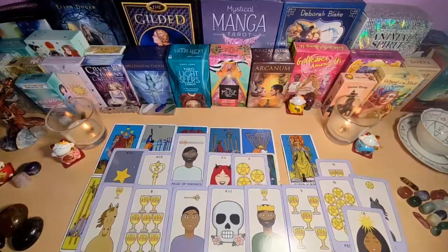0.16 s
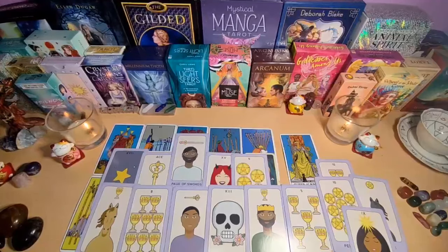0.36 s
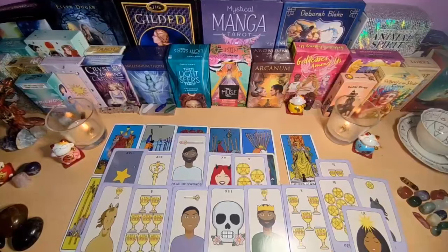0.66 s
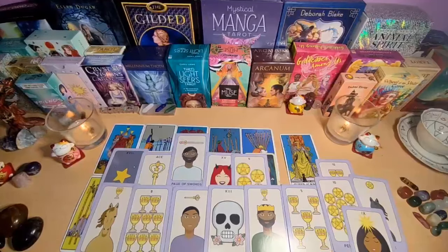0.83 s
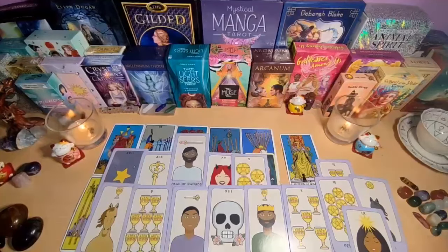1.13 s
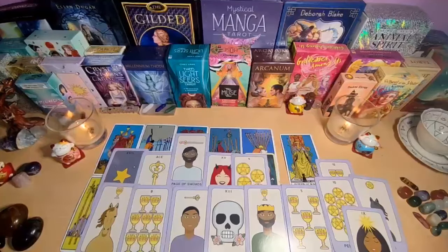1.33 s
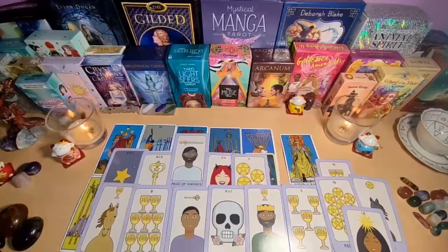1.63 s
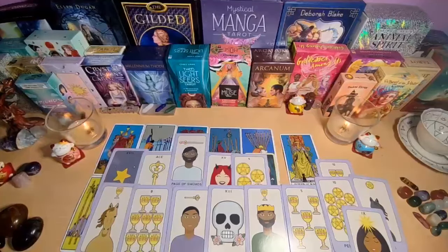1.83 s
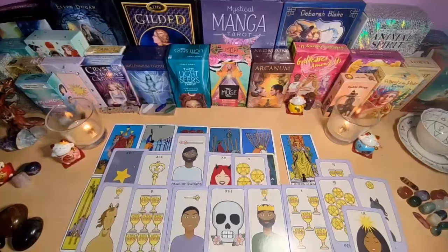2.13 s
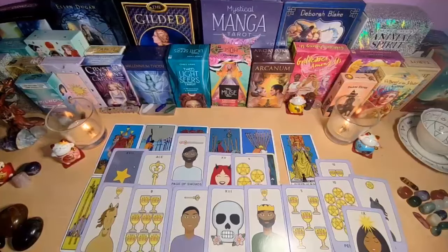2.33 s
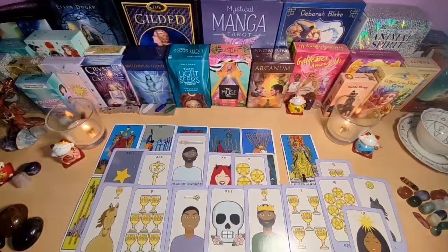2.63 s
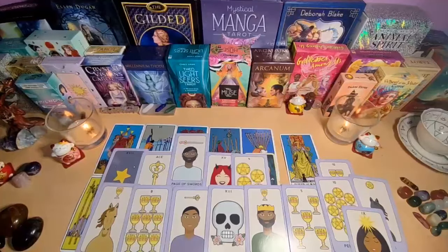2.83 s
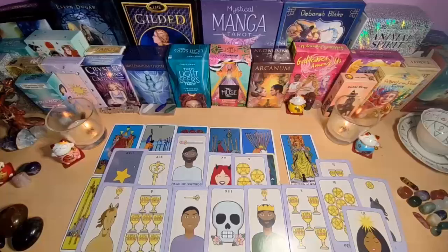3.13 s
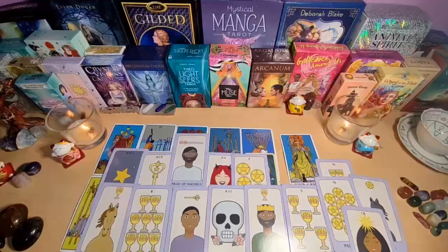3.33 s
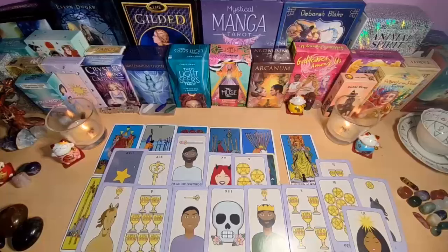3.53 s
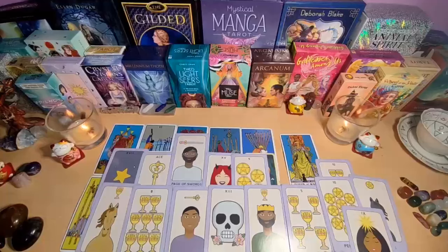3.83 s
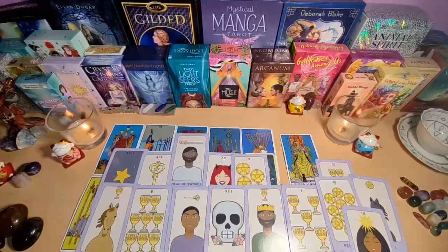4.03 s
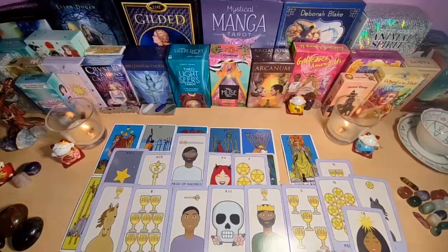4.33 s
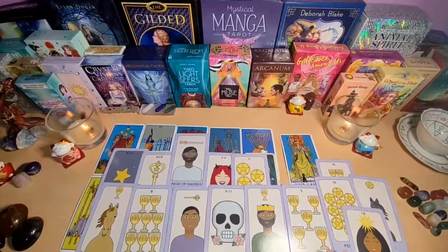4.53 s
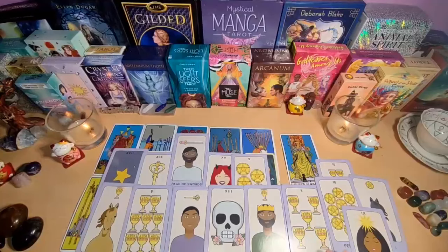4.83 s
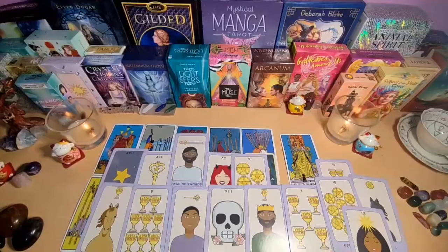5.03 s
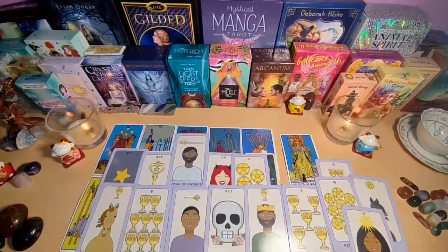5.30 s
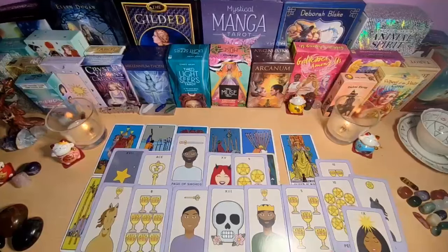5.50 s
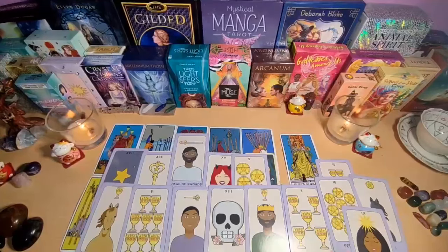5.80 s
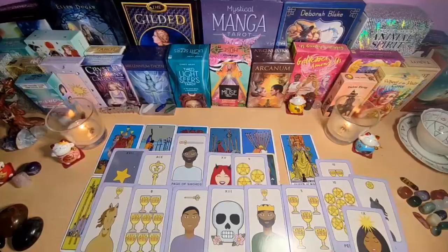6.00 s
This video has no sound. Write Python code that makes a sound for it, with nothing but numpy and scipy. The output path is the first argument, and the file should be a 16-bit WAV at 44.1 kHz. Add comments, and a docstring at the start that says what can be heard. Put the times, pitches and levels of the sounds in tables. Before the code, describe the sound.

Close to the microphone in a quiet room, a handful of light metal trinkets is shaken in a small container. Bright tinkling and hard rattling come in short bursts, fading after under two seconds. Irregular hollow taps and little ticks fill the middle. After some low handling bumps, the shaking returns with crisp, hissier jangling and continues to the end over soft air and low rumble.

```python
"""Small metal charms are stirred and shaken in a container, close by, in a quiet room.
From 0 s quick tosses jangle the heap (many ticked, ringing modes) and clatter on the wall (filtered contacts).
Loose charms ring out (tapped decaying sines); knocks (thud, clack, tick, one bounce) go on through the lull.
From 4.3 s a second spell of tosses follows, with wafts of air and soft bumps as it begins.
Throughout: low buffeting of the microphone, quiet room air and weak reflections; soft noise swells from 3.8 s."""
import sys
import numpy as np
from scipy import signal
from scipy.fft import rfft, irfft
from scipy.io import wavfile
from scipy.ndimage import uniform_filter1d

SR = 44100
rng = np.random.default_rng(int(sys.argv[2]) if len(sys.argv) > 2 else 0)


def store_wav(level_fs):
    """Save 16-bit WAV to argv[1]."""
    pcm = np.round(np.clip(np.atleast_2d(level_fs), -1, 1) * 32767)
    wavfile.write(sys.argv[1], SR, pcm.T.astype(np.int16))


N = 271656
TIME_S = np.arange(N) / SR

# spectrum of the room air: f/Hz, relative density/dB
AIR_SPECTRUM = [(41, -30), (70, -3.5), (129, -7), (277, -8), (323, -10), (546, -18.5), (1200, -24.5),
                (1980, -31), (10400, -39.5), (12200, -57.5), (13000, -46)]
# spectrum of the low buffeting: f/Hz, relative density/dB
RUMBLE_SPECTRUM = [(2, -18), (8, 11), (15, -22.5), (30, -11.5), (60, -29.5), (120, -39.5), (250, -75)]
# air wafted at the microphone by the moving hand: middle t/s, spread t/s, level before the buffeting trim/dB
WAFTS = [(.25, 0.34, -39), (3.88, 0.19, -38.5), (4.29, 0.11, -24), (4.55, 0.21, -39), (5.1, 0.21, -42.5),
         (5.9, 0.39, -38.5)]
# soft handling bumps: t/s, peak level/dB, f/Hz
BUMPS = [(4.142, -30, 50.2), (4.338, -20.5, 67), (4.586, -30.5, 218)]
# decay of the room: f/Hz, t60/s
ROOM_DECAY = [(200, .4), (1200, 0.41), (4000, 0.47), (8000, 0.14), (13000, 0.4)]
# soft broad noise swells; the last is a long mid-high hiss under the second spell:
# middle t/s, spread t/s, level/dB, centre f/Hz, half width/octaves
SWELLS = [(3.858, 0.021, -47.5, 460, 0.66), (3.795, .06, -55, 4300, .27), (4.2, 0.18, -64, 2980, 0.61),
          (4.24, .025, -56, 5500, .7), (5.1, 0.45, -47, 3300, 0.45)]
# modes of the container: mean f/Hz, mean relative level/dB, t60/s
CONTAINER_MODES = [(440, -11.5, .05), (620, 4, 0.024), (755, 1.5, 0.021), (942, -10, 0.09),
                   (1100, -3, 0.099), (1229, -2.5, 0.067), (1407, 12.5, 0.013), (1645, 6, 0.027),
                   (1897, 5.5, 0.0094), (2226, 5.5, .03), (2844, -10, 0.033), (4300, -15.5, .025)]
# blows of charms on the container, levels before trims:
# t/s, thud level/dB, thud centre f/Hz, clack level/dB, metal tick level/dB
KNOCKS = [(1.073, -30.5, 1159, -49, -30), (1.163, -29.5, 1870, -31.5, -27), (1.642, -52, 1110, -50, -26),
          (1.659, -23, 1860, -22, -12.5), (1.673, -46, 1360, -37, -32), (1.756, -41, 1200, -46, -32),
          (1.857, -56, 850, -52, -51), (1.873, -66, 1340, -43.5, -54.5), (1.892, -60, 1038, -45.5, -45),
          (1.937, -56, 1220, -42, -57), (2.049, -48, 496, -73, -81), (2.141, -30.5, 840, -31.5, -45),
          (2.223, -56, 840, -44.5, -48), (2.319, -60, 570, -51, -76), (2.49, -21.5, 620, -34, -39.5),
          (2.532, -29.5, 810, -38, -37.5), (2.5613, -26.5, 704, -33, -42), (2.579, -36.5, 990, -49.5, -45),
          (2.7243, -31.5, 1040, -37, -37), (2.738, -30, 1093, -41, -38), (2.776, -31.5, 810, -37, -32),
          (2.809, -32, 980, -40, -30.5), (2.943, -53, 910, -63, -55), (3.1923, -30, 700, -35, -38),
          (3.1995, -22.5, 864, -29.5, -31.5), (3.209, -26, 1000, -54, -50), (3.481, -72.5, 373, -57, -56),
          (3.605, -32, 900, -34.5, -38), (3.6125, -28.5, 706, -29.5, -35),
          (3.745, -26.5, 1120, -29.5, -40.5), (3.757, -42, 1300, -34, -43), (3.845, -39.5, 446, -58, -72.5),
          (4.203, -38, 1206, -50, -63), (4.221, -33, 1020, -53, -60), (4.287, -48, 1100, -44, -32.5),
          (4.331, -40.5, 570, -63, -39), (4.383, -29.5, 1810, -37, -40), (4.462, -26.5, 1750, -58, -39),
          (4.567, -35.5, 570, -62, -65), (4.584, -27.5, 361, -50, -46), (4.605, -28.5, 940, -43, -41),
          (4.686, -25, 670, -30.5, -46), (5.029, -38, 1400, -33, -48), (5.621, -31, 710, -53, -21.5),
          (5.742, -40.5, 1295, -32, -50), (5.829, -34, 1100, -41, -35), (5.89, -42, 750, -59, -34),
          (5.994, -34.5, 1090, -35, -39)]
# width of the thuds, broadest near 750 Hz, narrow for the highest: centre f/Hz, half width/octaves
THUD_WIDTHS = [(400, 0.66), (750, 0.97), (1100, .68), (1400, .65), (1700, .22)]
# colour of the wall's clack: f/Hz, gain/dB
CLACK_SPECTRUM = [(900, -12.5), (2000, 0.5), (2700, 2.5), (3400, -4.5), (4400, -3.5), (5200, -5.5),
                  (7500, -31)]
# colour of the metal tick: f/Hz, gain/dB
TICK_SPECTRUM = [(2500, -38.5), (4500, -8.5), (5600, 5.5), (7000, -0.5), (8500, -5.5), (10500, -6.5),
                 (12500, -9)]
# modes of the charms that ring clearly, by charm: f/Hz, relative level/dB, t60/s
CHARM_MODES = { "disc": [(3640, -15, 0.1), (6618, 1, 0.09), (7040, -16, .05), (8780, -22, 0.25),
               (10100, -16, .2)], "heart": [(1625, -6.5, 0.04), (3615, -12, 0.067), (6612, 14, 0.026),
               (8796, -16, 0.071), (9400, -14, 0.13), (10030, -28, .2)], "plate": [(6075, 8, 0.16),
               (8048, -24, .3), (8775, -22, .16), (10300, -23, 0.21), (10900, -12.5, 0.24)],
               "bar": [(3070, -2, 0.032), (5288, -7, 0.15), (6400, -23, .12), (7873, -11, .12),
               (9290, -13, .07), (10271, -9, 0.092)], "pendant": [(5440, -2, .07), (5840, 2, .05),
               (5620, 1, 0.028), (6880, -19.5, 0.072), (7065, -4, 0.09), (10265, -6, .1)],
               "bead": [(8140, -2, 0.2), (10250, 16.5, .1)], "star": [(10011, -8, 0.14),
               (11140, -4.5, .08)], "key": [(3600, -2.5, 0.038), (6560, -2, .04), (8785, -3, 0.09)],
               "hoop": [(4570, -2, .24), (5900, 0, .26), (10950, 0, .12), (11800, 0, .1)],
               "coin": [(2430, 9, 0.094), (2550, 6.5, 0.16), (2770, 7, 0.12), (2800, 9, 0.12)],
               "pin": [(4160, -3, .5), (6191, -9, .15), (8667, 0, .15)], }
# charms that swing free and chatter: t/s, charm, level before trim/dB, chatter length/s
RINGS = [(0.073, "bead", -35, 0.032), (0.124, "bar", -34.5, 0.044), (.212, "bar", -25.5, 0.053),
         (.285, "bar", -33.5, .025), (.42, "bar", -31, 0.085), (0.657, "pendant", -32, 0.023),
         (0.682, "bead", -30, 0.025), (0.876, "disc", -23.5, .002), (0.889, "disc", -24.5, .03),
         (.953, "key", -32.5, .015), (1.37, "bead", -34, .02), (1.452, "star", -37, .01),
         (1.494, "pendant", -29, 0.017), (1.529, "pendant", -31, 0.048), (1.636, "pendant", -29, 0.022),
         (1.658, "pendant", -32, 0.0038), (1.732, "disc", -33.5, .002), (1.755, "star", -36.5, 0.012),
         (1.938, "heart", -44.5, 0.0018), (2.14, "coin", -41.5, .008), (2.811, "hoop", -44, .004),
         (3.486, "pin", -69, .04), (3.748, "coin", -54, 0.006), (4.377, "heart", -27, .01),
         (4.453, "disc", -34, 0.0069), (4.463, "heart", -23, 0.0082), (4.815, "star", -37, .02),
         (5.164, "disc", -31.5, 0.041), (5.338, "bead", -40, .003), (5.594, "bead", -36, 0.0087),
         (5.599, "plate", -27, 0.036), (5.673, "plate", -21.5, 0.042)]
# colour of the heap's jangle: f/Hz, gain/dB
JANGLE_SPECTRUM = [(1290, -58), (2200, -14), (2730, -8.5), (2980, -4), (3390, -10), (4590, -9),
                   (5450, -1.5), (6140, -5.5), (8770, -8.5), (10200, -8.5), (10800, -9.5), (12400, -15.5),
                   (13000, -29)]
# colour of the wall's clatter at grip factor 1: f/Hz, gain/dB
WALL_SPECTRUM = [(100, -11), (250, -10), (450, -7), (750, -4), (1150, 1), (1800, 3.5), (2400, -3),
                 (3500, -14.5), (6000, -7)]
# grip on the container: from t/s, factor on the frequencies of the clatter's colour
GRIPS = [(0, 1), (1.24, 0.85), (4.55, 1.1)]
# flicks of the wrist tossing the heap: start t/s, tumble length/s,
# jangle level/dB, clatter level/dB, top treble relative to the jangle before trim/dB
TOSSES = [(0.0, 0.055, -39.5, -34.5, -1.5), (0.029, 0.063, -28, -30, -2.5),
          (0.155, 0.098, -27.5, -30.5, -2.5), (.277, 0.038, -31.5, -34, -3), (0.351, .26, -37, -36.5, -14),
          (.595, 0.032, -37, -33, -1.5), (.636, .07, -32, -36, -0.5), (.72, 0.27, -33, -34, -2.5),
          (0.996, .125, -41, -40.5, -3), (1.152, 0.064, -49, -41.5, -7), (1.258, 0.14, -36.5, -37.5, 0.5),
          (1.345, 0.093, -36.5, -43.5, -1), (1.477, 0.097, -35, -42, -0.5), (1.61, 0.05, -46, -42.5, -4),
          (1.748, 0.017, -38, -40.5, 5), (4.279, 0.028, -41, -37, -5), (4.35, .13, -44, -48.5, -4.5),
          (4.605, 0.17, -39.5, -37, -0.5), (4.717, .11, -30.5, -34.5, 1.5), (4.832, 0.12, -39.5, -40, 7),
          (4.937, 0.044, -35.5, -33, 11), (5.025, .075, -35, -35.5, 2), (5.115, 0.24, -33.5, -34, -5.5),
          (5.353, .11, -34, -36.5, -1.5), (5.453, 0.091, -30.5, -37, 0), (5.576, 0.14, -31, -39.5, 3.5),
          (5.748, 0.054, -42, -39, 3), (5.813, .11, -44, -46.5, 3), (5.918, .06, -34, -35, -4),
          (5.979, 0.21, -29, -32.5, -2)]


def amp(db):
    """Decibels to gain."""
    return 10 ** (np.asarray(db) / 20)


def evened(x):
    """Scales to rms 1."""
    return x / np.sqrt(np.mean(x ** 2) + 1e-20)


def steadied(x, size=2600):
    """Scales to a running rms of about 1, keeping the fast detail."""
    power = uniform_filter1d(uniform_filter1d(x ** 2, size), size // 2)
    return x / np.sqrt(abs(power) + 1e-12)


def peak_rms(x, size):
    """Rms of the loudest stretch of size samples."""
    return np.sqrt(uniform_filter1d(x ** 2, size, mode="constant").max())


def read(points, hz):
    """Interpolates a table on a log-frequency axis."""
    f, value = np.transpose(points)
    return np.interp(np.log(hz + 1), np.log(f + 1), value)


def bell(centre_hz, half_octaves, floor_db, top_hz):
    """Spectrum of one broad band, 3 dB down at the half width."""
    grid_hz = np.geomspace(50, top_hz, 40)
    fall_db = 3 * (np.log2(grid_hz / centre_hz) / half_octaves) ** 2
    return np.c_[grid_hz, np.maximum(-fall_db, floor_db)]


def add(mix, t_s, sound):
    """Mixes a sound in at a time."""
    part = mix[max(round(t_s * SR), 0):][:len(sound)]
    part += sound[:len(part)]


def coloured(x, points, size=2048):
    """Minimum-phase (causal) filter with the given spectrum."""
    gain_db = np.maximum(read(points, abs(np.fft.fftfreq(size, 1 / SR))), -100)
    log_gain = np.log(amp(gain_db))
    taps = np.fft.ifft(np.exp(np.conj(signal.hilbert(log_gain)))).real
    return signal.fftconvolve(x, taps)[:len(x)]


def noise(points):
    """Steady Gaussian noise with the given spectrum, rms 1."""
    gain = amp(read(points, np.fft.rfftfreq(N, 1 / SR)))
    return evened(irfft(rfft(rng.standard_normal(N)) * gain, N))


def ringing(modes, size=16000):
    """Dying sines: the answer of a body to one blow."""
    t = np.arange(size) / SR
    return sum(amp(db - 60 * t / max(t60_s, .003)) * np.sin(2 * np.pi * hz * t) for hz, db, t60_s in modes)


def in_container(x, ring_db, pitch_spread=0.041, place_db=3):
    """A blow plus container ringing; mode pitches and levels vary with where it lands."""
    modes = [(hz * rng.normal(1, pitch_spread), db + place_db * rng.standard_normal(), t60_s)
             for hz, db, t60_s in CONTAINER_MODES]
    ring = ringing(modes, size=5000)
    return x + amp(ring_db) * signal.fftconvolve(x, ring / np.linalg.norm(ring))[:len(x)]


def collisions(per_s=2600, spread_db=1.5, clump_db=2, clump_hz=80):
    """Random contacts of either sign, their force rising in little avalanches; a few are hard."""
    lowpass = signal.butter(2, clump_hz, fs=SR, output="sos")
    clumps = evened(signal.sosfilt(lowpass, rng.standard_normal(N)))
    hardness = np.minimum(rng.exponential(1, N), 4)
    force = amp(spread_db * hardness + clump_db * clumps)
    return force * rng.choice([-1, 1], N) * (rng.random(N) < per_s / SR)


def room_air(level_db=-58.5):
    """Steady quiet air of the room, as shaped noise."""
    return amp(level_db) * noise(AIR_SPECTRUM)


def buffeting(draught_db=-47, trim_db=5):
    """A steady draught and a few wafts of air rumble on the microphone; their powers add."""
    power = amp(draught_db) ** 2
    for middle_s, spread_s, db in WAFTS:
        power = power + (amp(db) * np.exp(-((TIME_S - middle_s) / spread_s) ** 2)) ** 2
    return amp(trim_db) * np.sqrt(power) * steadied(noise(RUMBLE_SPECTRUM), size=12000)


def handling_bumps(damping=3.9):
    """Soft bumps: low sines that swell and die, faster at higher pitch."""
    out, t = np.zeros(N), np.arange(SR // 4) / SR
    for t_s, db, hz in BUMPS:
        bump = np.sin(2 * np.pi * hz * t) * t * np.exp(-damping * hz * t)
        add(out, t_s, amp(db) * bump / abs(bump).max())
    return out


def room(x, build_s=0.0018, density=.12, count=3):
    """Dense weak reflections, decaying per band; their pattern shifts as the container moves."""
    out, t_tail = np.zeros(N), np.arange(SR) / SR
    for k in range(count):
        taps = rng.standard_normal(SR) * (rng.random(SR) < density)
        taps *= 1 - np.exp(-t_tail / build_s)
        hz, t, bands = signal.stft(taps, SR, nperseg=256)
        decay = amp(-60 * t / read(ROOM_DECAY, hz)[:, None])
        tail = signal.istft(bands * decay, SR, nperseg=256)[1]
        share = np.cos(np.pi * (TIME_S + k / count)) * np.sqrt(2 / count)
        out += signal.fftconvolve(x * share, tail / np.linalg.norm(tail))[:N]
    return out


def noise_swells():
    """Each swell is a soft rise and fall of fine random grains in one broad band."""
    out = np.zeros(N)
    for middle_s, spread_s, db, hz, half_octaves in SWELLS:
        grains = evened(coloured(collisions(), bell(hz, half_octaves, floor_db=-60, top_hz=13000)))
        out += amp(db) * grains * np.exp(-((TIME_S - middle_s) / spread_s) ** 2)
    return out


def contact(scrape_db, scrape_s, size=8000):
    """One sharp blow with a brief decaying skitter of noise."""
    skitter = rng.standard_normal(size) * np.exp(-np.arange(size) / SR / scrape_s)
    return signal.unit_impulse(size) + amp(scrape_db) * skitter / np.linalg.norm(skitter)


def knocks(trims_db=(-1, -1, 0), bounce_db=(-9, -18.5, -7.5), bounce_s=.0088, ring_db=-12, wall_hz=2400):
    """Container thud and clack plus charm tick (levels in that order), then one weaker bounce, its clack weakest."""
    out = np.zeros(N)
    wall_lowpass = signal.butter(3, wall_hz, fs=SR, output="sos")
    for t_s, thud_db, hz, clack_db, tick_db in KNOCKS:
        thud_spectrum = bell(hz, max(read(THUD_WIDTHS, hz), .2), floor_db=-40, top_hz=12000)
        blow_db = np.array([thud_db, clack_db, tick_db]) + trims_db
        for at_s, levels_db in (t_s, blow_db), (t_s + bounce_s, blow_db + bounce_db):
            thud = coloured(in_container(contact(scrape_db=14.5, scrape_s=0.0036), ring_db), thud_spectrum)
            thud = signal.sosfilt(wall_lowpass, thud)
            clack = coloured(in_container(contact(scrape_db=21.5, scrape_s=0.0024), ring_db), CLACK_SPECTRUM)
            tick = coloured(contact(scrape_db=14, scrape_s=0.0021), TICK_SPECTRUM)
            for part, db in zip((thud, clack, tick), levels_db):
                add(out, at_s, amp(db) * part / peak_rms(part, size=88))
    return out


def free_charms(chatter_per_s=420, trim_db=-1, first_tap=0.96):
    """A loose charm gets random taps that tend to grow harder, and rings on when they stop."""
    out = np.zeros(N)
    for t_s, charm, db, length_s in RINGS:
        taps = np.zeros(SR // 4)
        when, force = rng.random(40), rng.standard_normal(40)  # when: fraction of the chatter
        number = int(np.clip(length_s * chatter_per_s, 0, 40))
        places = (when * np.clip(length_s, 0, .24) * SR).astype(int)
        taps[places[:number]] = (force * np.sqrt(when))[:number]
        taps[0] = first_tap
        ring = signal.fftconvolve(taps, ringing(CHARM_MODES[charm]))
        add(out, t_s, amp(db + trim_db) * ring / peak_rms(ring, size=600))
    return out


def heap(hits, count=76, damped_t60_s=0.03, tick_db=-3, surfacing_db=5, turnover_hz=7):
    """Each contact ticks and rings one of many charms; they surface and sink as the heap turns over."""
    owner, rings = rng.integers(0, count, N), np.zeros(N)
    for k in range(count):
        pitch, hold = rng.random((2, 3))  # three modes a charm
        t60_s = damped_t60_s * 2 ** (2 * hold - 1)
        modes = zip(2200 + 10400 * pitch, rng.normal(0, 3, 3), t60_s)
        mine = owner == k
        exposure = np.clip(rng.standard_normal(200), -2, 2)
        exposed = np.interp(TIME_S[mine] * turnover_hz, np.arange(200), exposure)
        own_hits = np.zeros(N)
        own_hits[mine] = hits[mine] * amp(surfacing_db * exposed)
        rings += signal.oaconvolve(own_hits, ringing(modes, size=4000))[:N]
    return evened(rings) + amp(tick_db) * evened(hits)


def tumble(start_s, length_s, rise_s=0.016, sag_db_per_s=8.5, settle_db_per_s=211):
    """Power of one toss: a quick lift, a sagging tumble, then a faster settling."""
    t = np.maximum(TIME_S - start_s, 0)
    fall_db = sag_db_per_s * t + settle_db_per_s * np.maximum(t - length_s, 0)
    return (np.minimum(t / rise_s, 1) * amp(-np.minimum(fall_db, 200))) ** 2


def wall_clatter(hits, wall_share=0.78, ring_db=-15):
    """Most contacts also strike the wall, whose colour shifts with the grip; level steadied."""
    wall_hits = in_container(hits * (rng.random(N) < wall_share), ring_db)
    wall = np.zeros(N)
    for from_s, factor in GRIPS:
        spectrum = [(hz * factor, db) for hz, db in WALL_SPECTRUM]
        wall = np.where(TIME_S >= from_s, steadied(coloured(wall_hits, spectrum)), wall)
    return wall


def shaking(top_trim_db=4.5, top_hz=8500):
    """Each toss swells the heap's jangle and the wall's clatter, with its own share of top treble."""
    hits = collisions()
    metal = coloured(heap(hits), JANGLE_SPECTRUM)
    top = signal.sosfiltfilt(signal.butter(3, top_hz, "high", fs=SR, output="sos"), metal)

    powers = np.array([tumble(start_s, length_s) for start_s, length_s, *_ in TOSSES])
    jangle_db, clatter_db, bright_db = np.transpose(TOSSES)[2:]
    # overlapping tosses add in power
    jangle_gain, clatter_gain, top_gain = (
        np.sqrt(amp(db) ** 2 @ powers) + 1e-12 for db in (jangle_db, clatter_db, jangle_db + bright_db))

    charms = steadied(metal - top + amp(top_trim_db) * top_gain / jangle_gain * top)
    return jangle_gain * charms + clatter_gain * wall_clatter(hits)


def scene(jangle_room_db=-11, knock_room_db=-7):
    """Charms, knocks and noise swells with their reflections, over air and handling noise."""
    background = room_air() + buffeting() + handling_bumps()
    blows = knocks()
    jangle = noise_swells() + free_charms() + shaking()
    wet = room(amp(jangle_room_db) * jangle + amp(knock_room_db) * blows)
    return (background + wet + blows + jangle)[None]


def record(dry, edge_hz=12680):
    """The recorder's band limit: a steep linear-phase low-pass."""
    taps = signal.firwin(401, edge_hz, window=("kaiser", 8), fs=SR)
    return signal.oaconvolve(dry, taps[None], "same")


dry = scene()
out = record(dry)
store_wav(out)
```